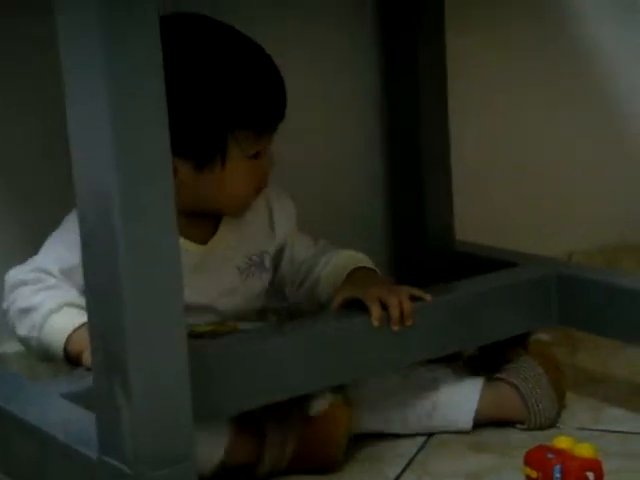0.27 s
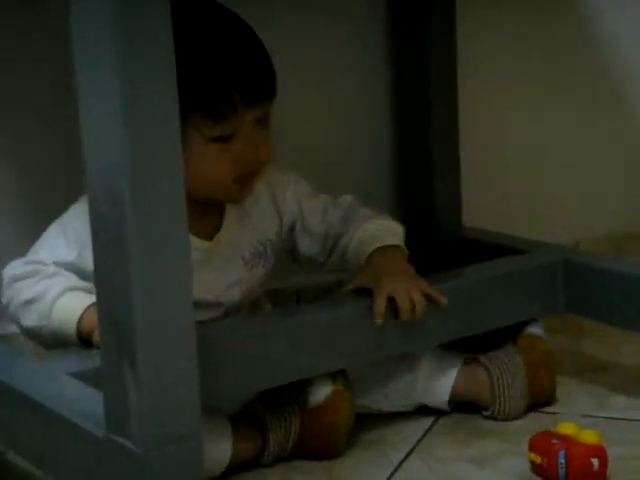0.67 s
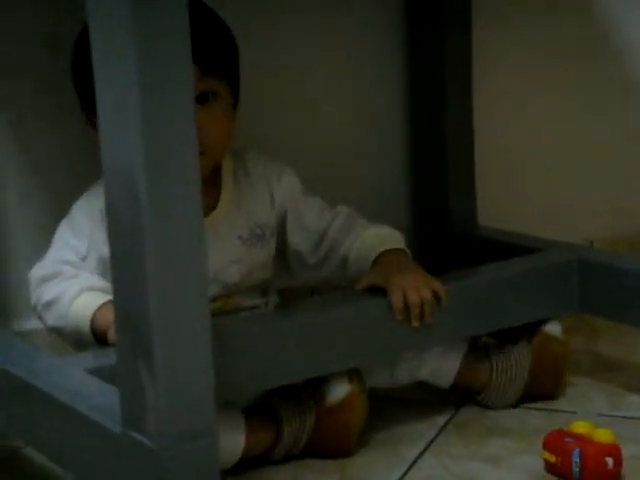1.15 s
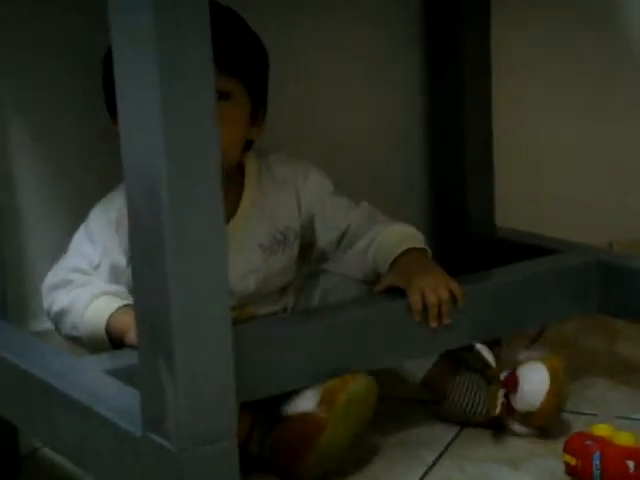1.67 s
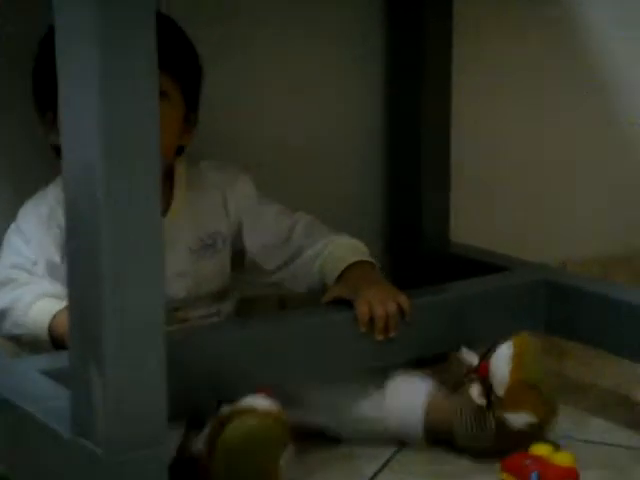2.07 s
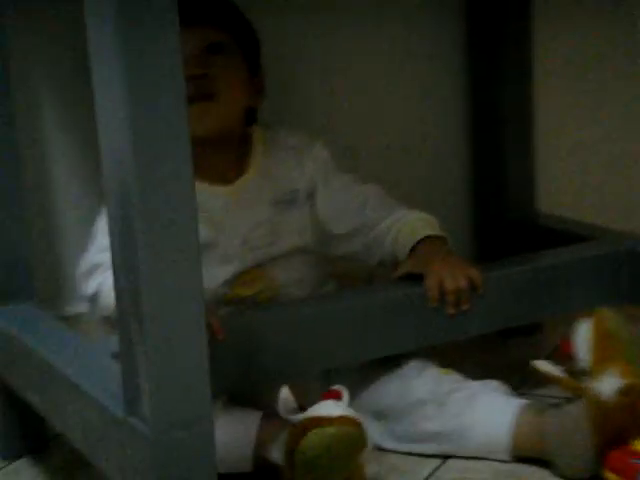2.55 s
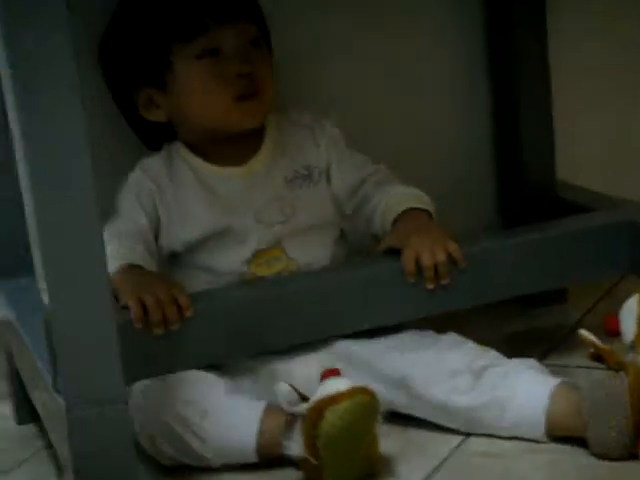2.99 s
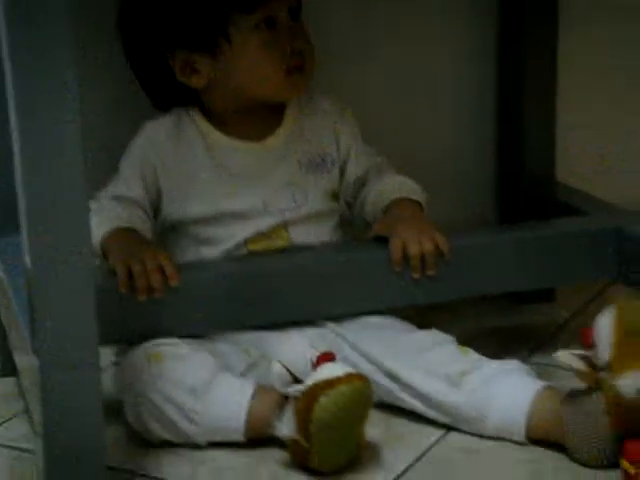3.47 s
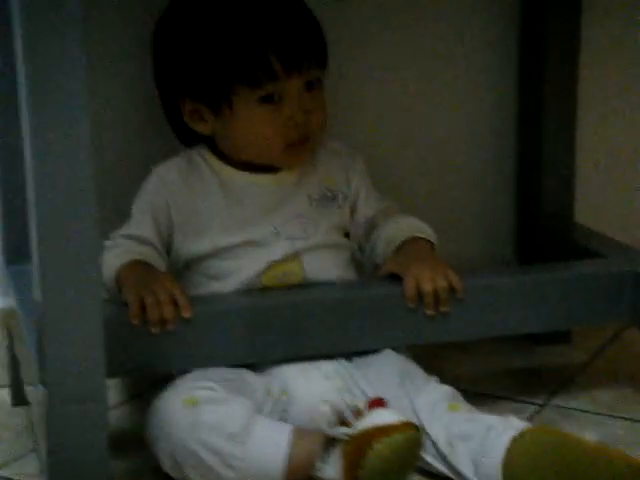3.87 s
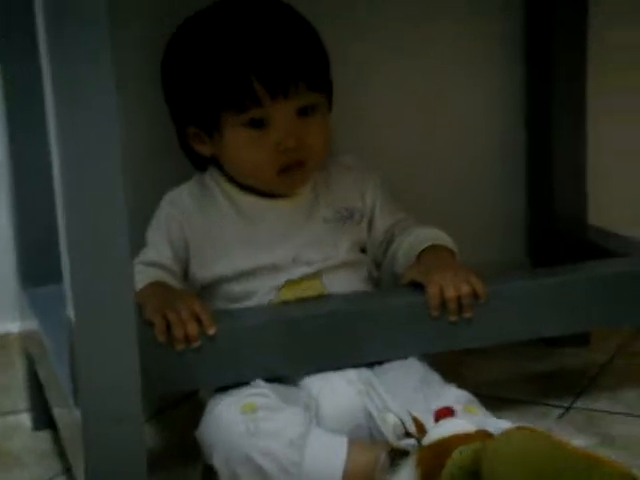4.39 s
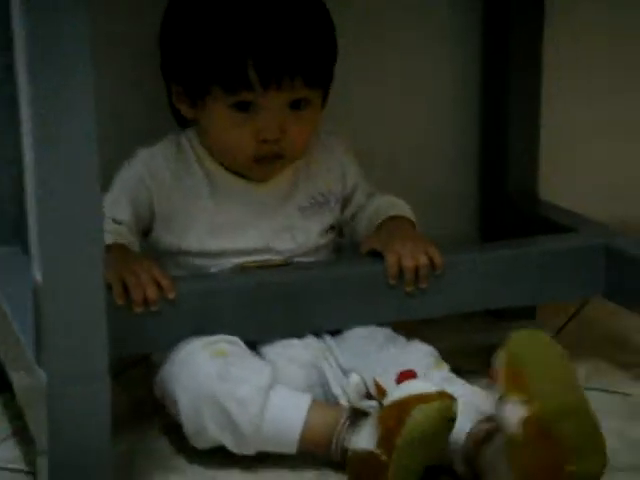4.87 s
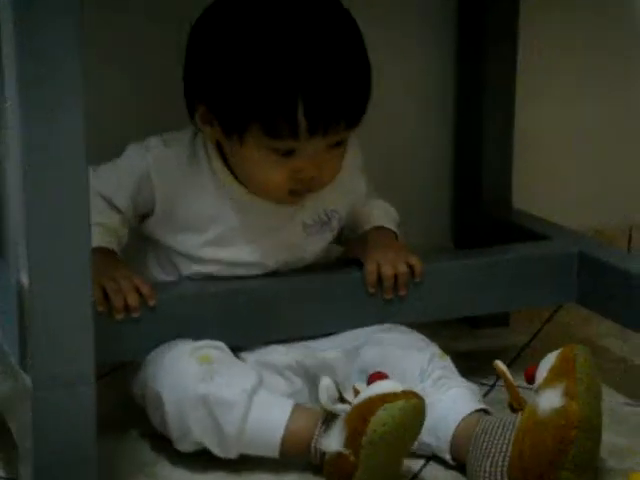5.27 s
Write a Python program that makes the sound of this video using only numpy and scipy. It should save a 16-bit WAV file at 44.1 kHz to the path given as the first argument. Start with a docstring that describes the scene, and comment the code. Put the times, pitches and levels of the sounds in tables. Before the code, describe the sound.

A soft murmur of air fills a bare, tiled room, heard in mono from fairly close with a dull top end. From 0 to 1 s there is faint cloth rubbing, a weak hollow rattle and a tiny tick near 0.2 s. At about 1.2 s a light tap sounds, then around 1.45-1.55 s a quick cluster of clearer hollow taps and a rattle. Slippers scuff near 1.95 and 2.25 s. A soft heel bump at 2.5 s leads into a hard plastic toy dragged until about 3.2 s, chattering and clicking in uneven catches amid hissing cloth. A lull follows. Near 3.75 s a foot swishes, and at 3.83 s comes by far the loudest event: a hard, cracking knock with a rough, short frame ring and thud, a weaker rebound at 3.9 s and tiny bounces until 4 s. The room tail and a faint low hum fade under gentle scuffs, rubbing and small bumps until 5.5 s.

```python
"""Child shuffling under a table

A small child shuffles under a metal table frame on a tiled floor. Slippers and cloth rub as shaped noise,
something hollow rattles and taps through resonances, and a heel drags a chattering plastic toy along.
Then a foot swishes and knocks hard with a few bounces: noisy cracks, a ringing frame and a thud.
A bare room answers with a fading noise tail, over a soft murmur of air. Both channels are the same.
"""
import sys
import numpy as np
from scipy import signal
from scipy.fft import rfft, irfft, next_fast_len
from scipy.io import wavfile
from scipy.ndimage import map_coordinates

SR = 44100
rng = np.random.default_rng(int(sys.argv[2]) if len(sys.argv) > 2 else 0)


def inscribe(sig):
    """Save sig as 16-bit PCM at rate SR to the path in sys.argv[1].

    A 1-D sig is mono; a 2-D sig holds one channel per row.
    Samples are clipped to [-1, 1] before scaling.
    """
    pcm = np.round(np.clip(np.atleast_2d(sig).T, -1, 1) * 32767)
    wavfile.write(sys.argv[1], SR, pcm.astype(np.int16))


N = 244314

# How long the room rings. Each row: pitch in Hz, time to fade by 60 dB in seconds.
ROOM_FADE = [(120, 0.47), (230, 1), (370, 1), (800, 0.64), (2000, 0.51), (8000, 0.43)]
# Tone of the murmuring air. Each row: pitch in Hz, relative level in dB.
AIR_TONE = [(15, -52), (25, -16), (60, -12), (124, -0.5), (530, 2), (586, 0.5), (1150, -1), (1560, -4),
            (3470, -7), (4930, -10.5), (7930, -13), (8760, -9.5), (9930, -13.5), (12900, -29),
            (21800, -120)]
AIR_LEVEL_DB = -52
# A low hum after the knocks. Each row: time in seconds, level in dB.
HUM_LEVEL = [(3.95, -66), (4.3, -61), (4.75, -65), (5.0, -70)]
# A heel drops softly on the tiles. Each row: start in seconds, level in dB, pitch in Hz.
HEEL_BUMPS = [(.015, -43.5, 560), (.58, -51, 130), (2.478, -32, 330), (2.895, -33.5, 270), (4.13, -38, 380),
              (4.24, -42, 400), (5.249, -43, 292)]
BUMP_FADE_S, BUMP_ATTACK_S = 0.13, 0.0036  # time to fade by 60 dB, time scale of the onset
# Sharp ticks. Each row: start in seconds, level in dB (1 dB is taken off later), pitch in Hz,
# length in seconds, band width as a share of the pitch (20 Hz is added later).
SHARP_TICKS = [(.203, -36.5, 2510, 0.0055, 0.32), (1.189, -31.5, 2970, 0.0037, 0.38),
               (1.515, -24.5, 4000, 0.0042, 0.13), (2.762, -20.5, 3530, 0.0079, 0.47),
               (2.8, -23, 3530, 0.011, 0.26), (3.697, -36, 2940, .004, 0.65), (4.229, -37, 2480, .004, .6),
               (4.527, -48, 2400, .004, .5), (4.767, -40, 2650, 0.0073, 0.37), (5.32, -43, 2830, .004, .5)]
# Soft taps. Each row: start in seconds, peak in dB, pitch in Hz, length in seconds.
SOFT_TAPS = [(1.187, -39.5, 1214, 0.0071), (1.454, -25.5, 1088, 0.011), (1.475, -28.5, 1083, 0.012),
             (1.508, -21, 1044, 0.0067), (1.522, -21, 1200, 0.0054), (1.972, -29, 1430, 0.0046),
             (2.247, -38, 1366, 0.0099), (2.672, -31.5, 1350, 0.015), (2.974, -22, 1290, 0.0043),
             (3.031, -22.5, 1240, 0.0036), (3.051, -35, 1310, 0.018), (4.758, -48, 1260, 0.0068)]
# Shakes of the hollow thing. Each row: peak time, rise and fall in seconds, level in dB.
HOLLOW_SHAKES = [(.072, 0.1, .1, -46), (.27, 0.16, .2, -42.5), (.69, .02, 0.36, -58),
                 (1.188, .02, 0.56, -49.5), (1.44, 0.3, 0.036, -44.5), (1.48, .03, 0.16, -37.5),
                 (1.514, 0.069, 0.16, -32)]
# Notes of its cavity. Each row: pitch in Hz, width in Hz, relative level in dB.
CAVITY_NOTES = [(550, 57, -18), (770, 23, -2.5), (780, 620, -4.5), (1120, 210, 6), (2500, 140, -9),
                (4020, 430, -20.5)]
# Strokes of cloth on tile. Each row: peak time, rise and fall in seconds,
# then levels in dB for the weight, the hiss and the fine hiss.
CLOTH_STROKES = [(.03, 0.024, 0.5, -58.5, -68, -58), (.25, 0.38, .25, -60, -48.5, -54),
                 (1.0, 0.54, 0.98, -65, -68, -64), (1.19, 0.022, 0.51, -58, -52, -55),
                 (1.36, 0.081, 0.36, -53.5, -53, -55), (1.51, 0.092, .25, -48, -44, -48.5),
                 (1.9, 0.1, 0.72, -72, -52.5, -53.5), (1.97, 0.063, 0.15, -49.5, -49, -54),
                 (2.25, 0.78, 0.66, -61, -50.5, -57), (2.481, 0.075, 0.75, -46, -47, -54),
                 (2.8, 0.55, 0.32, -43.5, -37.5, -42), (3.04, 0.42, 0.28, -45.5, -34.5, -40.5),
                 (3.25, 0.59, 0.12, -48.5, -44, -54), (3.63, 0.23, .4, -62, -52, -59.5),
                 (3.755, 0.027, 0.37, -53, -55, -46), (4.05, 0.11, 0.36, -47, -49, -62),
                 (4.3, 0.65, 1.5, -50, -52.5, -54.5), (4.533, 0.067, 1.9, -52.5, -51, -54.5),
                 (4.776, 0.095, 0.69, -51.5, -50, -54.5), (5.03, 0.11, 0.64, -53.5, -46.5, -53.5),
                 (5.32, 0.024, 0.33, -50, -53, -53.5)]
# Tones of those three layers. Each row: pitch in Hz, relative level in dB.
WEIGHT_TONE = [(24, -55), (40, -18), (86, -26), (113, -3.5), (146, -10), (199, -4), (394, -1), (700, -6),
               (910, -9), (1540, -120)]
HISS_TONE = [(1060, -34), (1800, -4.5), (2040, -5), (2590, -0.5), (5200, -5), (6760, -25), (11400, -120)]
FINE_HISS_TONE = [(3240, -54), (5500, -2.5), (7420, -3.5), (9540, -7), (9930, -5), (12900, -42),
                  (21800, -120)]
# Scuffs of a sole. Each row: peak time, rise and fall in seconds, level in dB, pitch in Hz,
# width as a share of the pitch.
SOLE_SCUFFS = [(1.93, .04, 0.25, -46, 1440, .37), (1.975, 0.024, 0.14, -39.5, 1210, 0.4),
               (2.248, 0.014, 0.84, -45, 1450, 0.31), (2.45, 0.44, 0.044, -49, 1320, 0.44),
               (3.72, 0.17, 0.16, -58, 1260, 0.94), (4.33, 2, 1, -48.5, 1020, 0.68),
               (4.518, 0.064, 0.4, -52, 1030, 0.39), (4.762, .02, 0.38, -48.5, 970, 0.24),
               (5.04, 0.22, 0.18, -45, 1300, 1), (5.37, 0.26, 0.24, -51, 1300, .6),
               (5.53, 0.074, .1, -50, 1350, 0.7)]
# The rubbing and scuffing dip for a moment. Each row: time in seconds, depth in dB.
SHUFFLE_DIPS = [(4.5, 5.5), (4.751, 5), (5.292, 10)]
DIP_S = 0.012  # time from the middle of a dip to 1/e of its depth
# The dragged toy. Each row: time in seconds, steady shell level in dB, belly level in dB.
TOY_DRAG = [(2.47, -45.5, -42.5), (2.63, -38, -42.5), (2.68, -34, -37.5), (2.83, -35, -41),
            (2.92, -34.5, -37), (3.05, -32.5, -39), (3.19, -37, -41), (3.5, -74, -82)]
# The shell catches on the tiles. Each row: peak time in seconds, level in dB.
SHELL_CATCHES = [(2.682, -38), (2.758, -30.5), (2.797, -32), (2.868, -34), (2.897, -32), (2.984, -28),
                 (3.05, -29.5), (3.14, -34)]
CATCH_RISE_S, CATCH_FALL_S = 0.036, 0.025  # times to climb and lose 20 dB
# Notes of the toy's shell. Each row: pitch in Hz, width in Hz, relative level in dB.
SHELL_NOTES = [(1100, 50, -4), (1199, 29, 1), (1255, 32, -3), (1315, 29, 0.5), (1380, 36, 2),
               (1500, 39, -5), (1638, 96, -4), (2040, 190, -12.5), (2280, 61, -7), (3530, 1100, -15.5),
               (4210, 120, -12)]
# Notes of the toy's belly. Each row: pitch in Hz, width in Hz, relative level in dB.
BELLY_NOTES = [(630, 74, -6), (726, 73, 1), (806, 103, -0.5), (911, 78, -1)]
# The foot slides before the knock. Each row: time in seconds, level in dB.
FOOT_SWISH = [(3.745, -57), (3.752, -50), (3.776, -43.5), (3.782, -34), (3.8, -33), (3.83, -31.5)]
# The knock and its bounces. Each row: start in seconds, crack strength in dB,
# thump strength in dB (sets the ring and the thud, each shifted later).
KNOCK_BLOWS = [(3.832, -17.5, -9.5), (3.904, -28, -17.5), (3.929, -50, -27.5), (3.95, -43, -23),
               (4.0, -45, -28)]
# Notes of the metal frame. Each row: pitch in Hz, average relative level in dB,
# time to fade by 60 dB in seconds.
FRAME_NOTES = [(118, -5, 0.45), (151.2, -2.5, 0.44), (226, 2, 0.39), (330.3, 2, 0.44), (394.6, -7, 0.61),
               (444, -16, 0.41), (561, -8, 0.14), (687, -6, 0.1), (802, 0, 0.13), (880, 0, 0.14),
               (1010, 3, 0.11), (1245, 6.5, 0.09), (1220, -9, 0.1), (1675, -7, 0.048), (2110, -8, 0.03)]
# Tone of the crack. Each row: pitch in Hz, relative level in dB.
CRACK_TONE = [(88, -40), (150, -10), (330, -2), (715, -1.5), (1340, -5.5), (2280, -3.5), (3470, -11.5),
              (5190, -15), (9930, -27), (12900, -58), (21800, -120)]
# What the blow leaves in floor and walls. Each row: pitch in Hz, relative level in dB.
THUD_TONE = [(53, -38), (90, -9), (131, -1.5), (183, -13), (218, -6), (410, -5.5), (529, -9), (900, -5),
             (1440, -9), (2310, -12.5), (9930, -29), (12900, -59), (21800, -120)]


def amp(db):
    """Turn decibels into a plain multiplier."""
    return 10 ** (np.asarray(db) / 20)


def unit(x):
    """Scale a sound to an average (RMS) strength of 1."""
    return x / np.sqrt(np.mean(x ** 2) + 1e-20)


def along(points, hz):
    """Read a value between (Hz, value) points on a log pitch axis."""
    point_hz, value = np.transpose(points)
    return np.interp(np.log(hz + 1), np.log(point_hz + 1), value)


def curves(rows):
    """One value per sample for each column; the level fades in before the rows and out after them."""
    s, level, *columns = np.transpose(rows)
    t = np.arange(N) / SR
    fade_db = -400 * np.maximum(s[0] - t, 0) - 1200 * np.maximum(t - s[-1], 0)
    return [np.interp(t, s, level) + fade_db] + [np.interp(t, s, c) for c in columns]


def strokes(s, rise_s, fall_s, db):
    """Gain of strokes that climb 20 dB in rise_s to their peak at s and lose 20 dB in fall_s; powers add."""
    t = np.arange(0, N / SR, 1e-3)
    s, rise_s, fall_s, db = (np.reshape(v, (-1, 1)) for v in (s, rise_s, fall_s, db))
    slope = np.where(t < s, (s - t) / rise_s, (t - s) / fall_s)
    gain = np.sqrt(np.sum(amp(db - 20 * slope) ** 2, axis=0))
    return np.interp(np.arange(N) / SR, t, gain)


def wobble(rate):
    """A smooth random curve through `rate` random points a second."""
    points = rng.standard_normal(int(N * rate / SR) + 4)
    return map_coordinates(points, [np.arange(N) * rate / SR])


def grit(lumpy_db, grain_db):
    """Friction: noise that catches and slips, slowly and grain by grain."""
    return rng.standard_normal(N) * amp(lumpy_db * wobble(40) + grain_db * wobble(500))


def filtered(x, response):
    """Multiply each frequency of x by a response."""
    m = next_fast_len(N + SR // 2)
    return irfft(rfft(x, m) * response(np.fft.rfftfreq(m, 1 / SR)), m)[..., :N]


def shaped(x, tone):
    """Give x the tone drawn by (Hz, dB) points."""
    return filtered(x, lambda hz: amp(along(tone, hz)))


def coloured(x, tone):
    """Shape x, then scale it to strength 1."""
    return unit(shaped(x, tone))


def body(notes):
    """The response of a few resonances, with alternating signs."""
    def response(f):
        total = 0
        for k, (hz, width, db) in enumerate(notes):
            total = total + (-1) ** k * amp(db) * 1j * f * width / (hz * hz - f * f + 1j * f * width)
        return total
    return response


def room(x):
    """The room's answer: a short delay, then a noise tail whose frequencies each die at their own speed."""
    hz, t, z = signal.stft(rng.standard_normal(SR), SR, nperseg=256)
    fade = amp(-60 * t / along(ROOM_FADE, hz)[:, None])
    tail = signal.istft(z * fade, SR, nperseg=256)[1]
    delayed = np.pad(x, (300, 0))  # samples
    return signal.fftconvolve(delayed, tail / np.linalg.norm(tail))[:N]


def air():
    """A soft murmur of air: gently uneven noise with a fixed tone."""
    return amp(AIR_LEVEL_DB) * coloured(grit(lumpy_db=0.94, grain_db=1.4), AIR_TONE)


def hum():
    """A low hum: noise squeezed twice through one narrow bass resonance."""
    note = body([(114, 17, 0)])
    noise = filtered(rng.standard_normal(N), lambda hz: note(hz) ** 2)
    return amp(curves(HUM_LEVEL)[0]) * unit(noise)


def bumps():
    """Each soft heel drop is a short low note, quickly damped by the cloth."""
    out, t = np.zeros(N + SR), np.arange(SR // 4) / SR
    onset = 1 - np.exp(-t / BUMP_ATTACK_S)
    for s, db, hz in HEEL_BUMPS:
        fade = amp(db - 60 * t / BUMP_FADE_S)
        out[round(s * SR):][:len(t)] += fade * onset * np.sin(2 * np.pi * hz * t)
    return out[:N]


def ticks():
    """Tiny hard contacts: a puff of noise in one band."""
    out, t = np.zeros(N + SR), np.arange(2048) / SR
    f = np.fft.rfftfreq(len(t), 1 / SR)
    for s, db, hz, length, width in SHARP_TICKS:
        puff = np.exp(-t / (length / 2)) * rng.standard_normal(len(t))
        band = body([(hz, width * hz + 20, 0)])
        puff = irfft(rfft(puff) * band(f) ** 2)
        out[round(s * SR):][:len(t)] += amp(db - 1) * puff / abs(puff).max()
    return out[:N]


def taps():
    """A few cycles of the struck cavity that swell and stop."""
    out = np.zeros(N + SR)
    for s, db, hz, length in SOFT_TAPS:
        t = np.arange(int(length * SR) + 2) / SR
        swell = abs(np.sin(np.pi * t / t[-1])) ** 0.58
        out[round(s * SR):][:len(t)] += amp(db) * swell * np.sin(2 * np.pi * hz * t)
    return out[:N]


def rattle():
    """Loose grains, as gritty noise, excite a cavity with one strong note."""
    grains = grit(lumpy_db=0.0, grain_db=2.0)
    return strokes(*np.transpose(HOLLOW_SHAKES)) * unit(filtered(grains, body(CAVITY_NOTES)))


def rubbing():
    """Weight rolls over the tiles and fabric hisses: three layers of friction noise."""
    layers = [coloured(grit(lumpy_db=1.4, grain_db=0.9), WEIGHT_TONE),
              coloured(grit(lumpy_db=1.7, grain_db=1.5), HISS_TONE),
              coloured(grit(lumpy_db=1.1, grain_db=2.5), FINE_HISS_TONE)]
    s, rise_s, fall_s, *levels = np.transpose(CLOTH_STROKES)
    return sum(strokes(s, rise_s, fall_s, db) * layer for db, layer in zip(levels, layers))


def scuffs():
    """Each scuff has a resonance set by the pressure of the sole, over a broad rasp."""
    friction = grit(lumpy_db=1.04, grain_db=1.5)
    out = np.zeros(N)
    for s, rise_s, fall_s, db, hz, width in SOLE_SCUFFS:
        sole = body([(hz, width * hz, 0), (2400, 1100, -13)])  # the second note is the rasp
        out += strokes(s, rise_s, fall_s, db) * unit(filtered(friction, sole))
    return out


def pauses():
    """A gain with brief, smooth dips for the rubbing and scuffing."""
    t = np.arange(N) / SR
    return amp(-sum(db * np.exp(-((t - s) / DIP_S) ** 2) for s, db in SHUFFLE_DIPS))


def dragging():
    """Hard plastic chatters over the tiles: friction noise rings the toy's shell and belly."""
    friction = grit(lumpy_db=-0.5, grain_db=0.5)
    s, db = np.transpose(SHELL_CATCHES)
    steady = amp(curves(TOY_DRAG)[0])
    shell_gain = np.hypot(steady, strokes(s, CATCH_RISE_S, CATCH_FALL_S, db))
    belly_gain = amp(curves(np.array(TOY_DRAG)[:, ::2])[0])  # time and belly columns
    shell = shell_gain * unit(filtered(friction, body(SHELL_NOTES)))
    belly = belly_gain * unit(filtered(friction, body(BELLY_NOTES)))
    return shell + belly


def swish():
    """The sliding foot whispers: smooth noise through three broad resonances, applied twice."""
    whisper = body([(770, 600, -2.5), (3800, 1900, -2.0), (7780, 1100, -9.5)])
    foot = filtered(rng.standard_normal(N), lambda hz: whisper(hz) ** 2)
    return amp(curves(FOOT_SWISH)[0]) * unit(foot)


def frame_ring(t):
    """The frame's fading notes, their phases wandering at random so that the ring sounds rough."""
    drift = np.cumsum(rng.standard_normal((len(FRAME_NOTES), len(t))), axis=1) * 0.018
    notes = np.zeros(len(t))
    for (hz, level, fade_s), phase in zip(FRAME_NOTES, drift):
        gain = amp(level + rng.normal(0, 1.4) - 60 * t / fade_s)
        notes += gain * np.sin(2 * np.pi * hz * t + phase)
    return notes * (1 - np.exp(-t / 0.0019))  # soft onset


def knocks():
    """A burst of crack, a rough ring of the frame, and a thud that dies away in the room."""
    ring, crack, blows = np.zeros(N + SR), np.zeros(N + SR), np.zeros(N)
    t = np.arange(SR // 2) / SR
    u = t / 0.0045  # a crack peaks after 4.5 ms
    burst = u * np.exp(.5 - u * u / 2)
    for s, crack_db, thump_db in KNOCK_BLOWS:
        start = round(s * SR)
        ring[start:][:len(t)] += amp(thump_db - 17) * frame_ring(t)
        crack[start:][:len(t)] += amp(crack_db) * burst * rng.standard_normal(len(t))
        blows[start] = amp(thump_db)
    # shaping the crack keeps its energy
    bright = shaped(crack[:N], CRACK_TONE)
    bright *= np.linalg.norm(crack) / np.linalg.norm(bright)
    thud = shaped(blows, THUD_TONE)
    thud *= amp(16.5) * np.linalg.norm(blows) / np.linalg.norm(thud)
    heard = ring[:N] + bright + room(thud)
    # a steep low cut keeps deep bass out of the knocks
    return filtered(heard, lambda hz: (1j * hz / (75 + 1j * hz)) ** 4)


def scene():
    """Add all layers; the room answers the small contacts here and the thuds inside knocks()."""
    background = air() + hum()
    small = taps() + ticks() + bumps()
    echo = room(amp(-11) * small)
    shuffle = (rubbing() + scuffs()) * pauses()
    mono = background + small + echo + rattle() + shuffle + dragging() + swish() + knocks()
    return np.array([mono, mono])


def record(dry):
    """The top end falls off steeply: 0.25 dB for every Hz above 9983 Hz."""
    return filtered(dry, lambda hz: amp(-.25 * np.maximum(hz - 9983, 0)))


dry = scene()
out = record(dry)
inscribe(out)
```